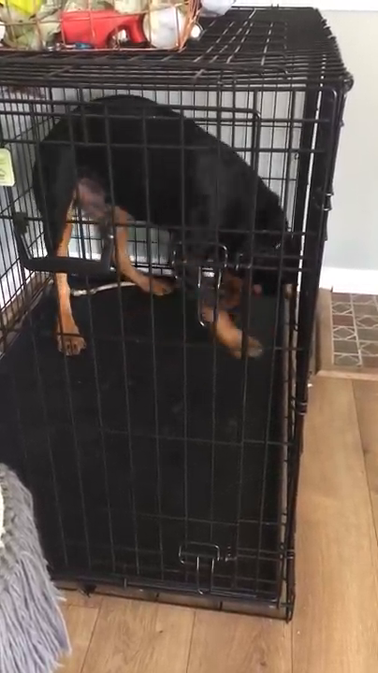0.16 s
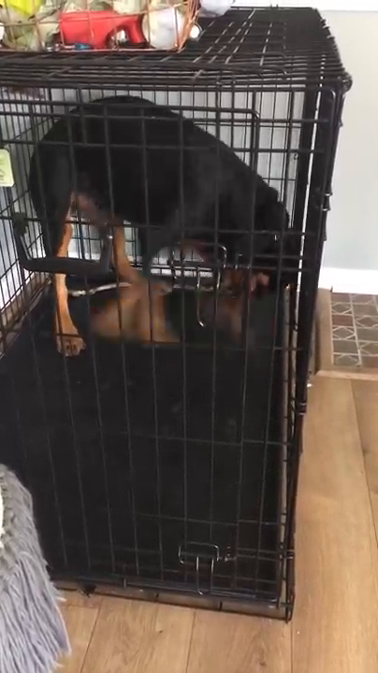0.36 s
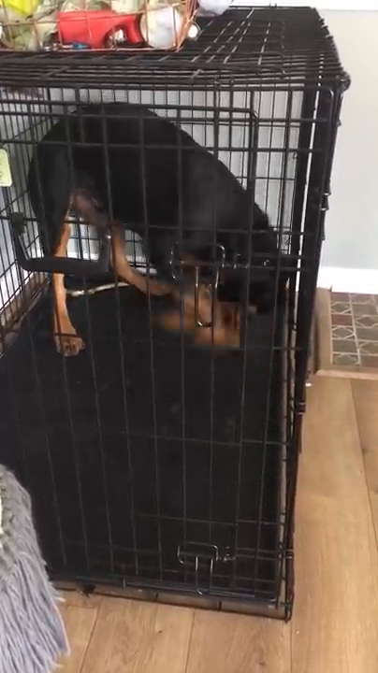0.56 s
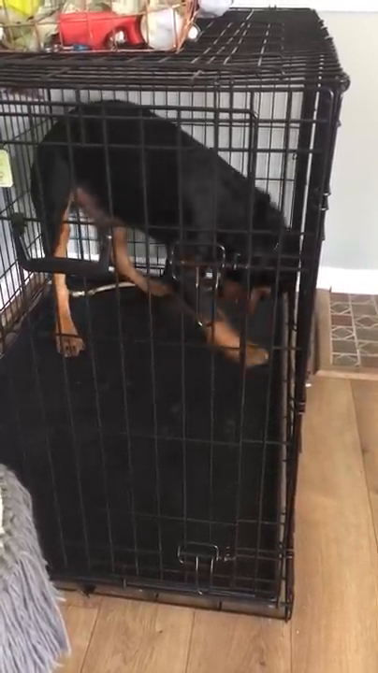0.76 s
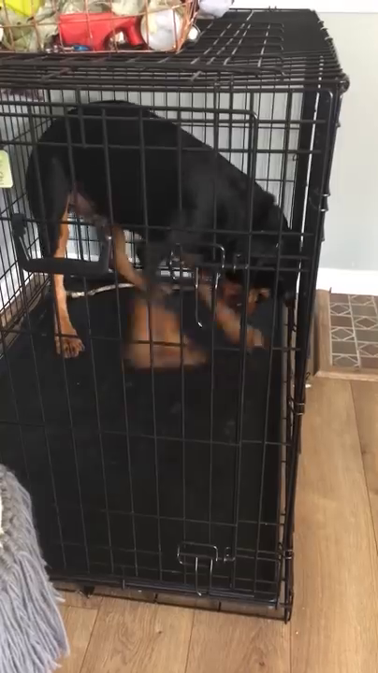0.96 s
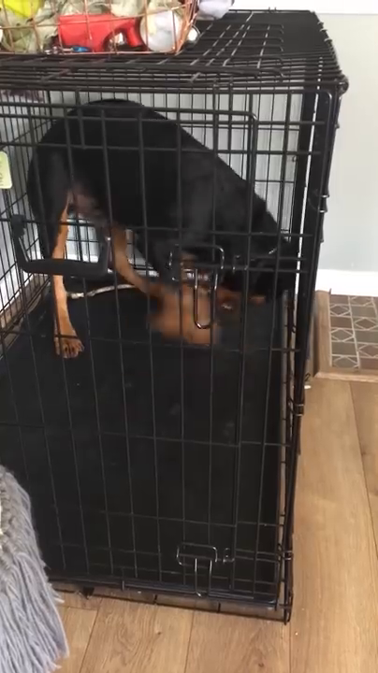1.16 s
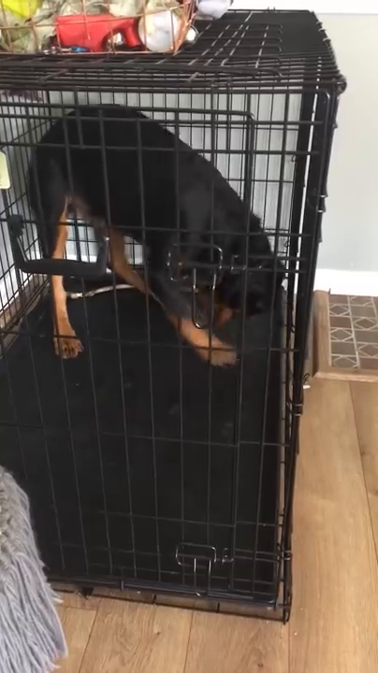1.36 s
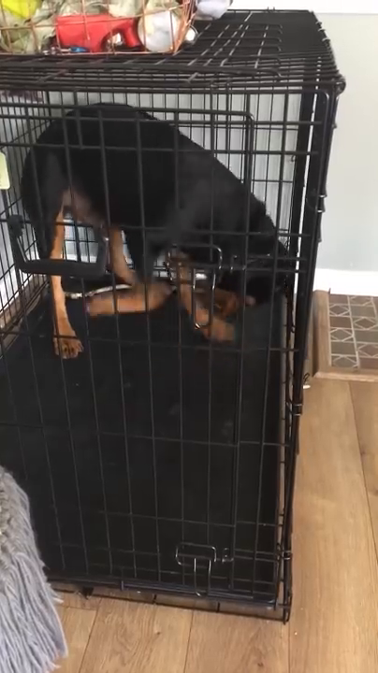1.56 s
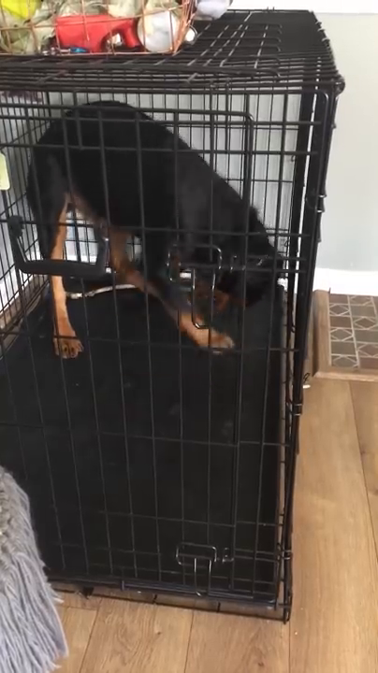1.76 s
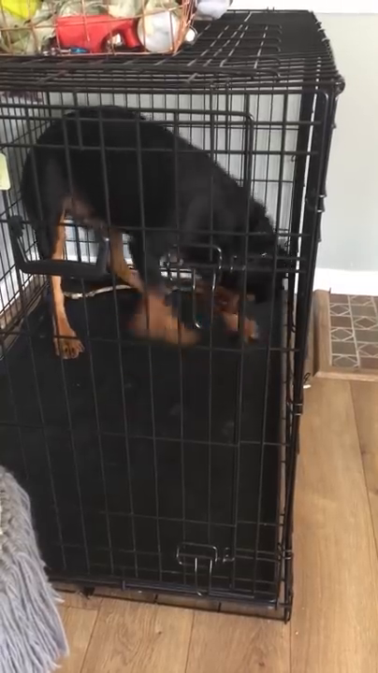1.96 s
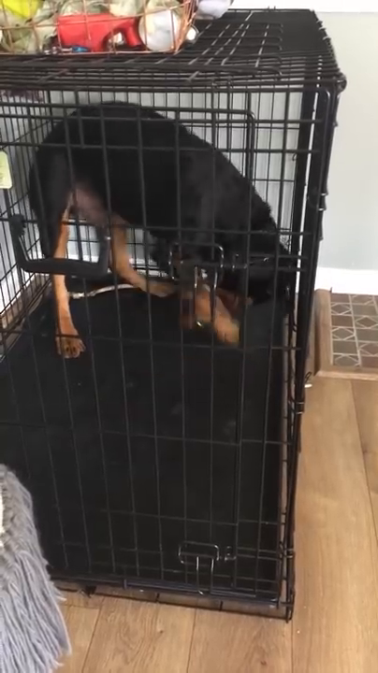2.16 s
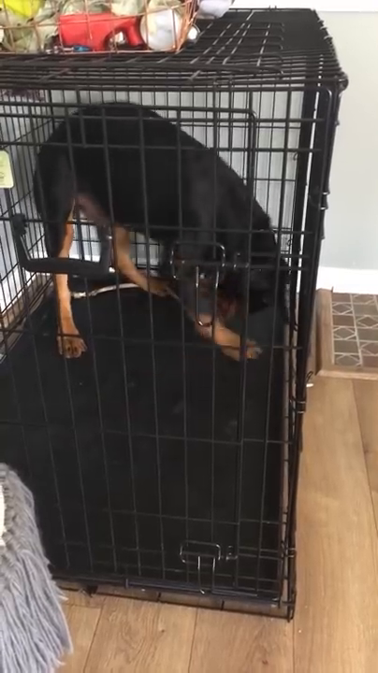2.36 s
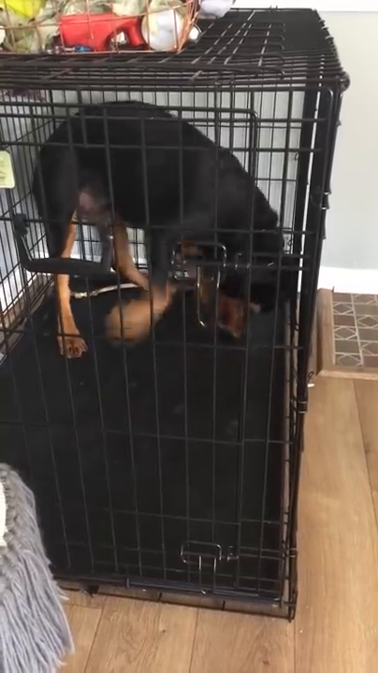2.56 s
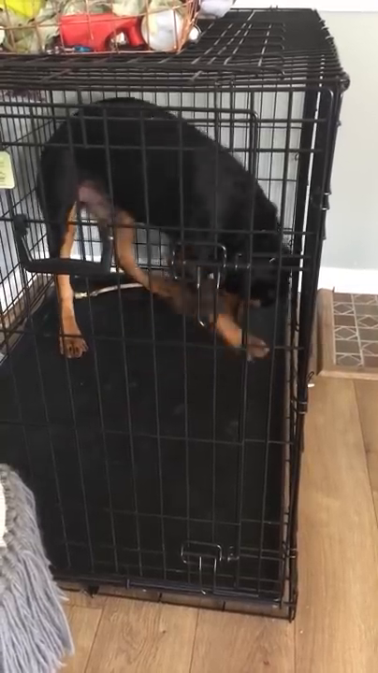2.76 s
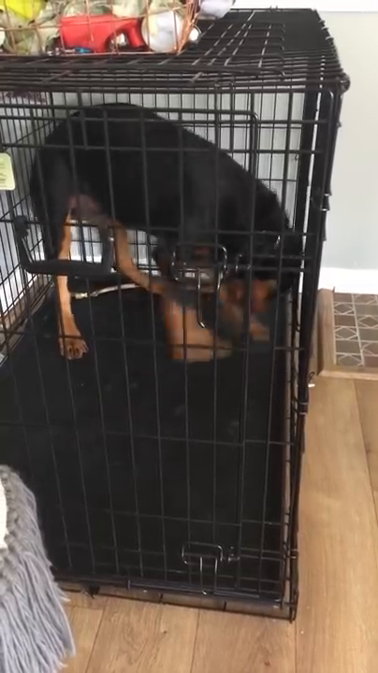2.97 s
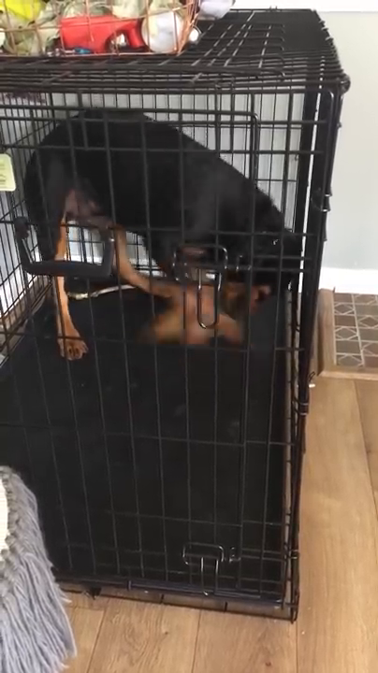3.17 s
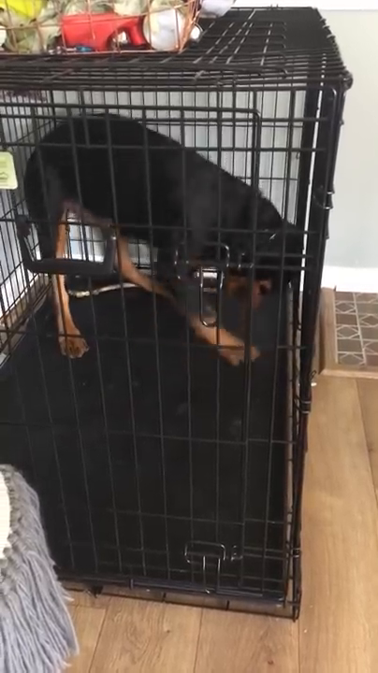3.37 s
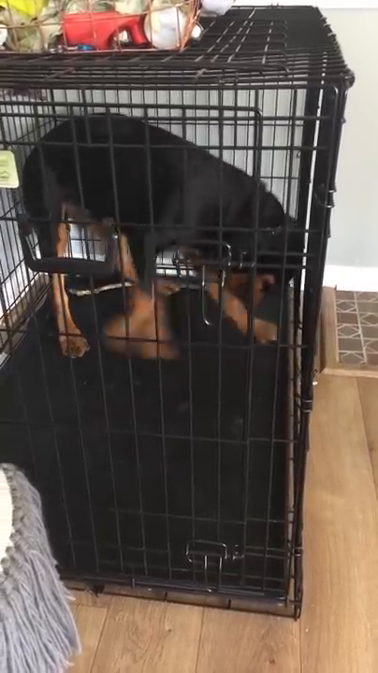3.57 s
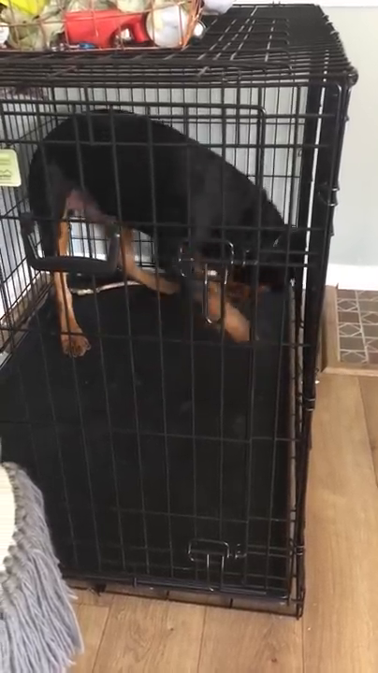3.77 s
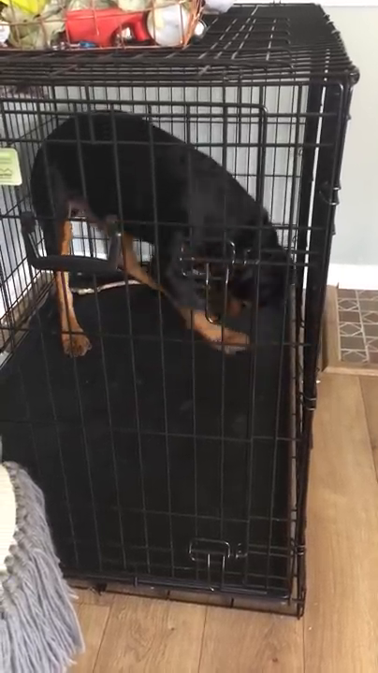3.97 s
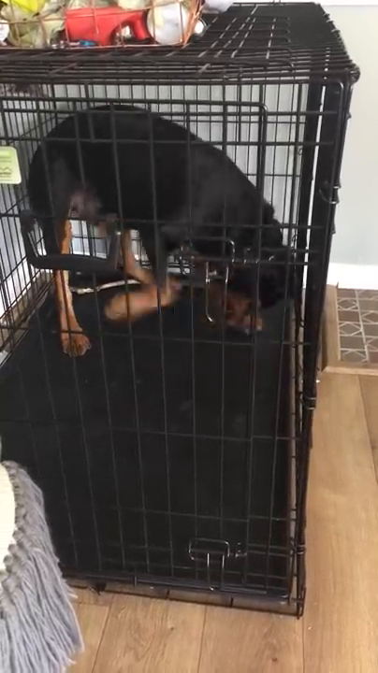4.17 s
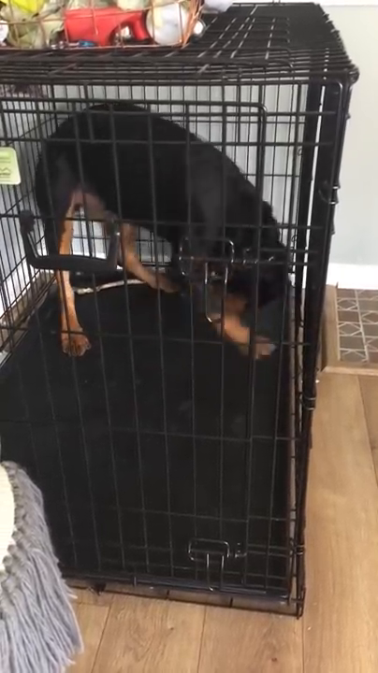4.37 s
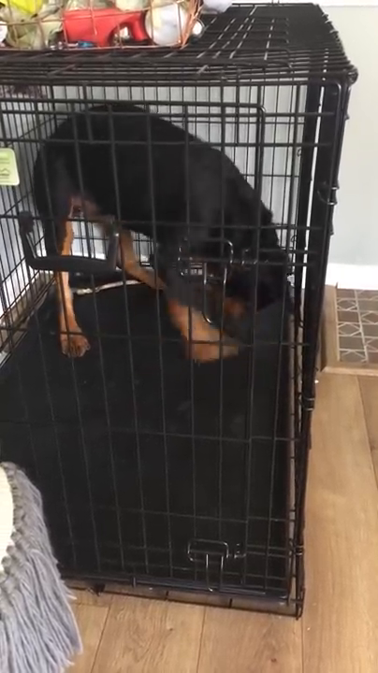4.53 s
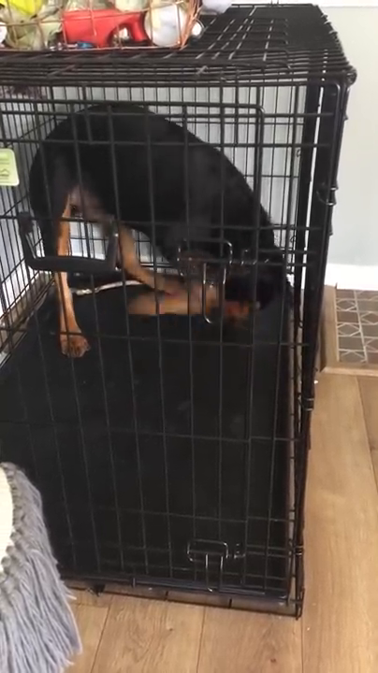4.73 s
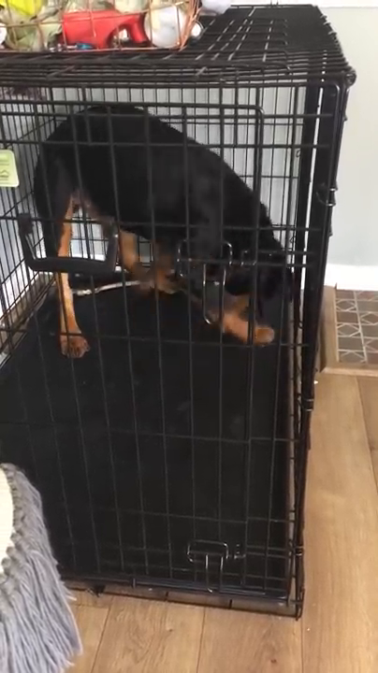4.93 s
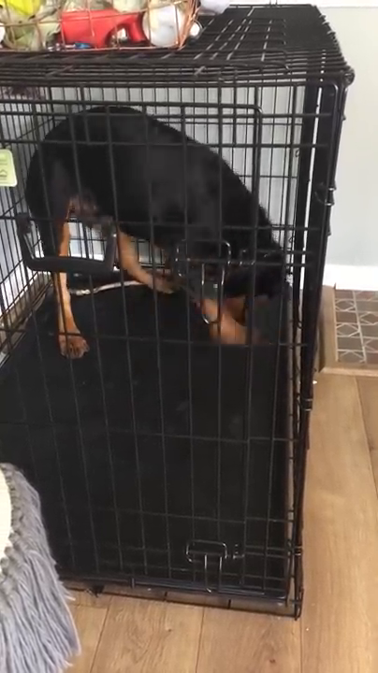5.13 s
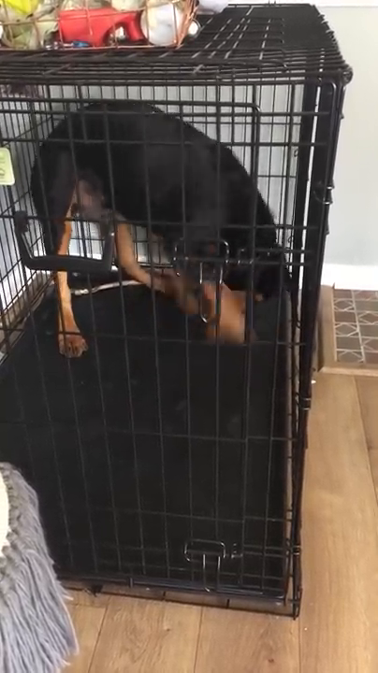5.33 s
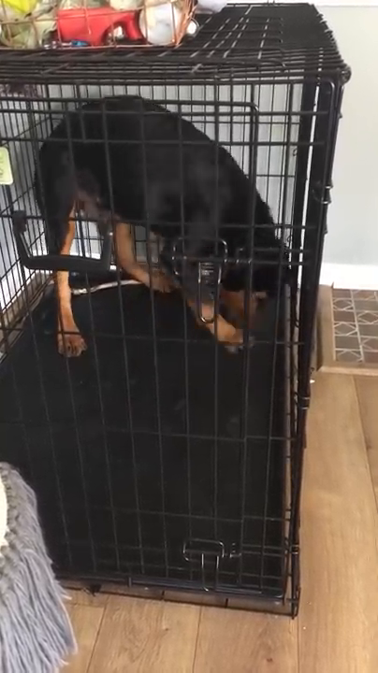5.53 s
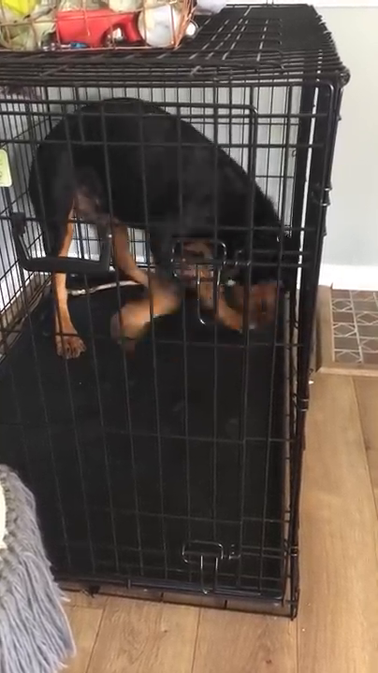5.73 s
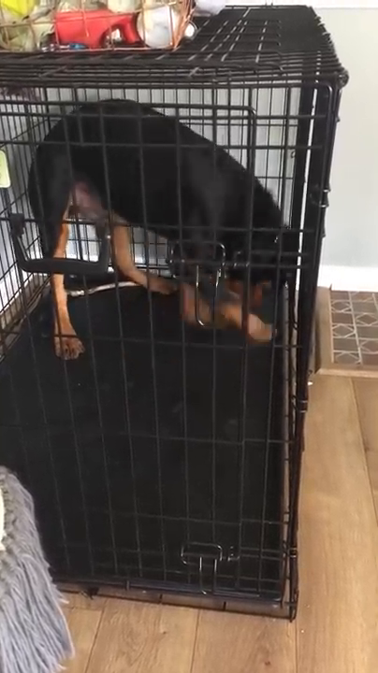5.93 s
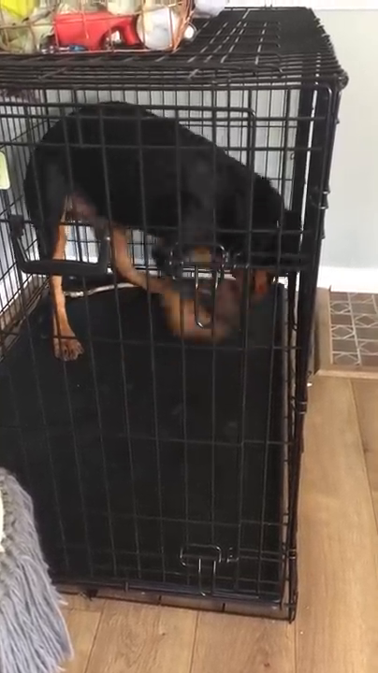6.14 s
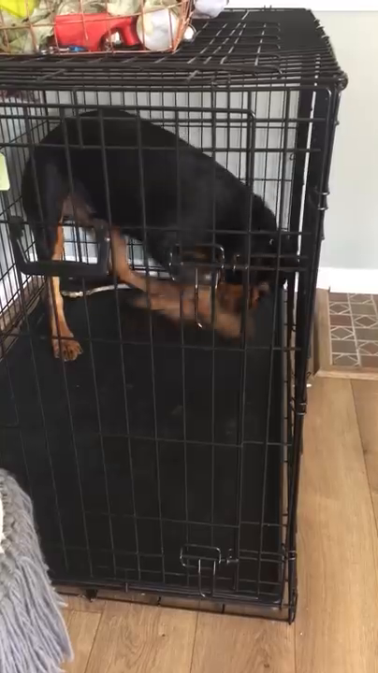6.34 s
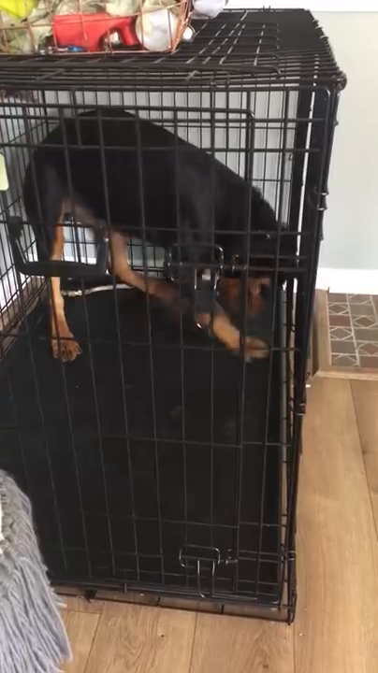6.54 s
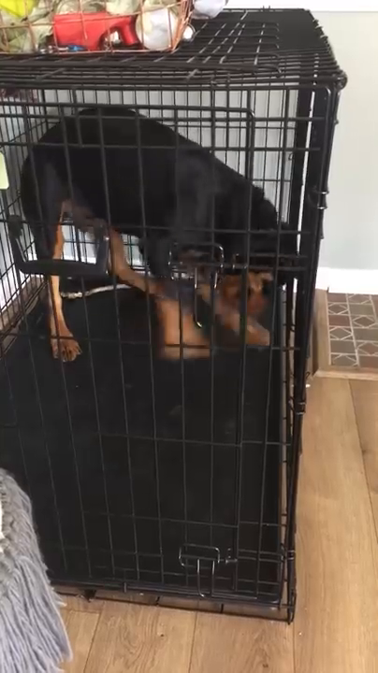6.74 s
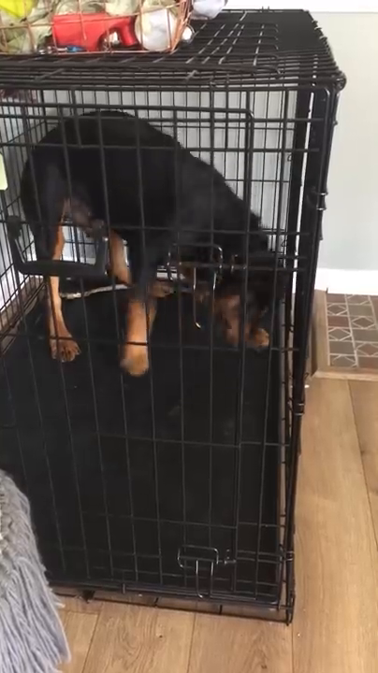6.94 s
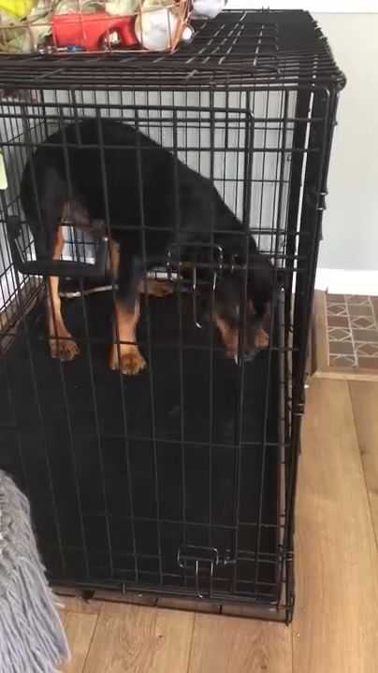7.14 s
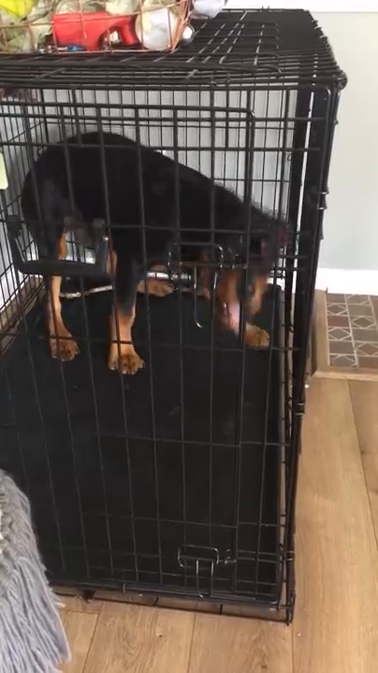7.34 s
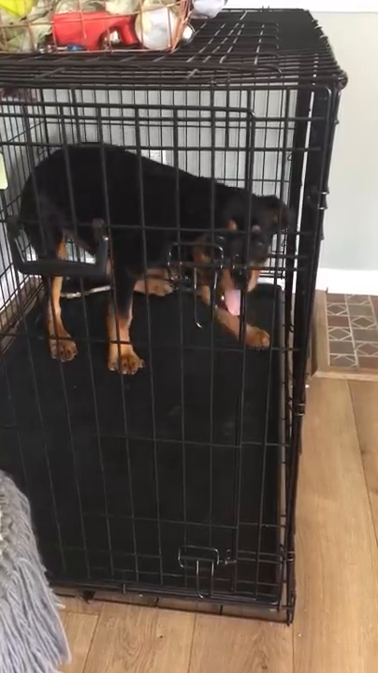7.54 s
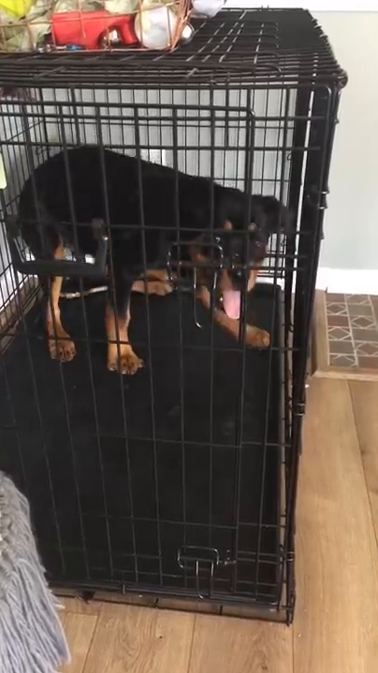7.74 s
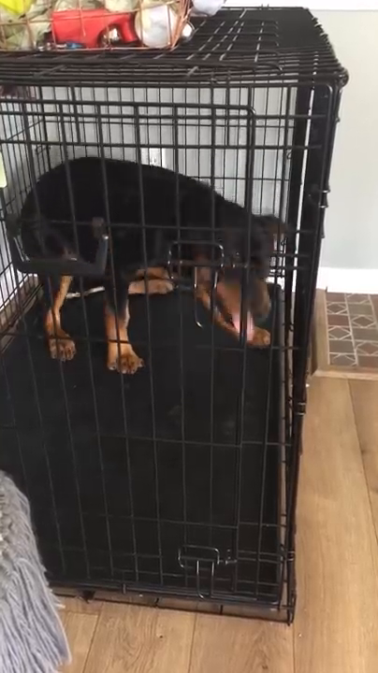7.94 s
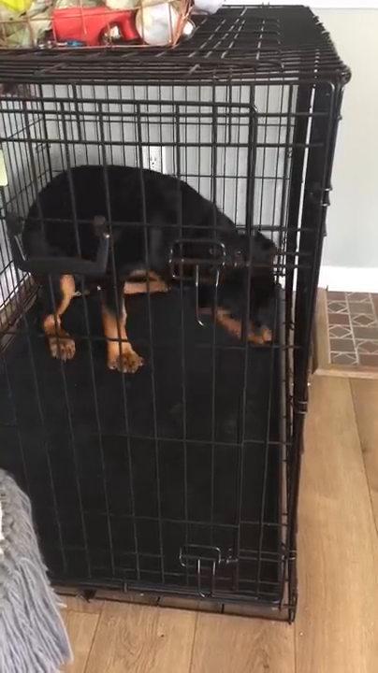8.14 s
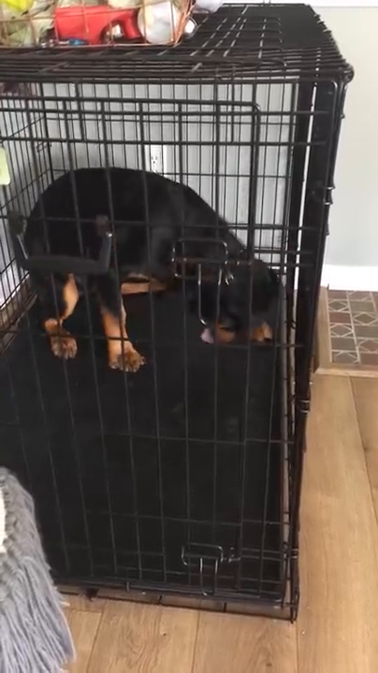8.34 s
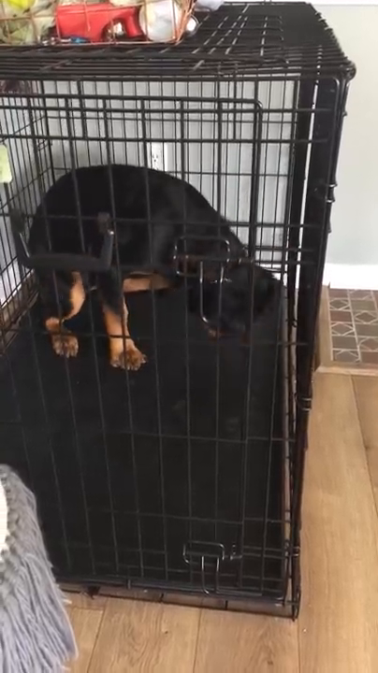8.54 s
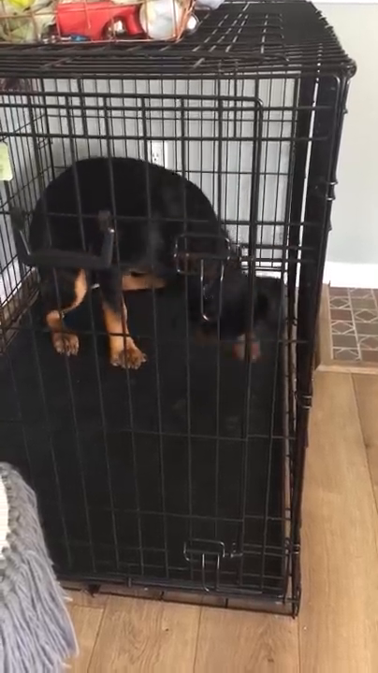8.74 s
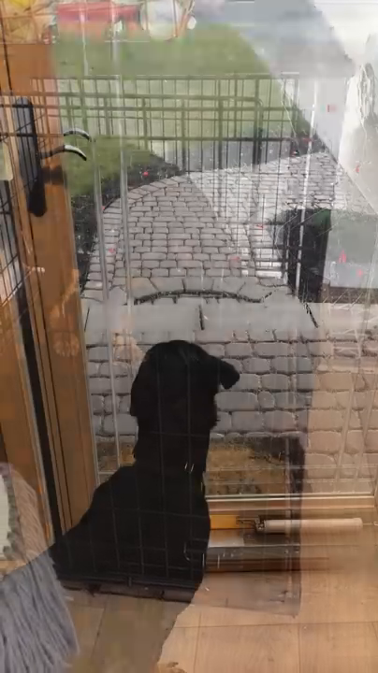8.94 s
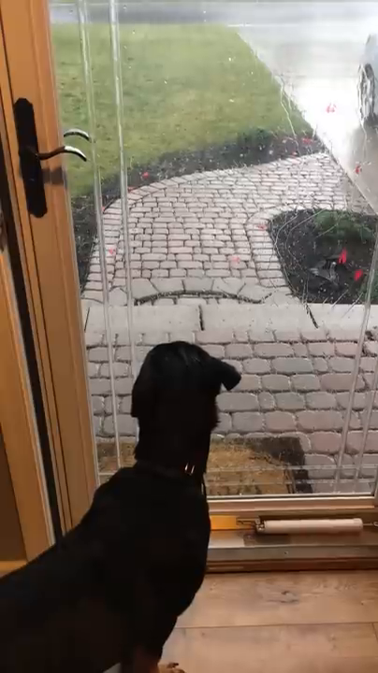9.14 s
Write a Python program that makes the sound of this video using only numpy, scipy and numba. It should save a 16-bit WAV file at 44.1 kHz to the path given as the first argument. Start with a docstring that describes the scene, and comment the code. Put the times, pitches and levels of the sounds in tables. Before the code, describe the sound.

A dog digs fast at a wire crate's hard tray, claws scraping and tags chinking, then pauses to pant faintly.

```python
"""Claws judder over the hard tray of a wire crate: a puppy digging with alternate forepaws, a metre
or two from a phone microphone in a bare room. The claw tips catch and slip, ringing the tray and
shaking the crate; paws thump, collar tags chink. The pup stops to pant, shifts and digs once more.
The sound breaks off during a clatter; after a short silence comes a low rumble in another spot."""
import sys
import numpy as np
from scipy import signal
from scipy.fft import rfft, irfft
from scipy.io import wavfile
from scipy.ndimage import uniform_filter1d
from numba import njit

SR = 44100
rng = np.random.default_rng(int(sys.argv[2]) if len(sys.argv) > 2 else 0)


def pcm_store(signal):
    """Save signal as 16-bit PCM."""
    levels = np.round(np.clip(np.atleast_2d(signal), -1, 1) * 32767)
    wavfile.write(sys.argv[1], SR, levels.astype(np.int16).T)


N = 410130
T = np.arange(N) / SR

# Paw contacts. Levels are relative; tilt is upper over lower tray modes; rasp and pad are re the tray.
# claw strokes: peak_s, level_db, rise_s, fall_s, tilt_db, rasp_db
CLAW_STROKES = [(0.076, -26.5, 0.046, 0.018, 0, -23), (0.369, -29.5, 0.032, 0.039, -1.5, -34),
                (0.565, -25, .007, 0.021, 1, -22), (0.927, -31.5, 0.021, 0.023, 0.5, -26),
                (1.183, -28, 0.093, .039, -1.5, -26.5), (1.427, -30, .057, 0.035, -3.5, -28),
                (1.684, -25.5, 0.02, 0.017, 0.5, -22), (1.917, -28, 0.033, 0.017, 4, -18),
                (2.167, -26, 0.029, 0.036, -0.5, -24), (2.451, -30, .035, 0.033, -0.5, -29),
                (2.719, -28, 0.06, 0.023, -0.5, -25), (2.942, -31.5, 0.022, .045, 0.5, -29),
                (3.211, -28.5, 0.043, .03, 0, -23), (3.478, -29, 0.032, 0.024, -2, -28),
                (3.748, -27.5, 0.07, 0.048, -1.5, -24), (4.027, -28, 0.026, 0.048, -4, -26.5),
                (4.299, -26, 0.024, 0.026, -1, -30.5), (4.596, -29, 0.037, 0.022, -2, -26.5),
                (4.799, -26.5, 0.042, 0.03, -1.5, -28.5), (5.097, -30.5, 0.037, .025, -2.5, -32),
                (5.369, -30, 0.045, .047, -2, -26.5), (5.631, -30, 0.014, .014, 9.5, -13.5),
                (5.871, -29.5, 0.073, 0.057, -3, -24.5), (6.181, -29.5, 0.042, 0.02, 0, -23),
                (6.366, -27.5, 0.013, 0.03, 6, -12.5), (6.655, -31, 0.01, 0.021, -3.5, -25),
                (6.699, -30, 0.023, 0.024, -4, -30), (6.96, -31.5, 0.1, 0.062, -2, -27),
                (8.631, -39.5, 0.054, 0.082, 2, -25), (8.754, -34.5, 0.05, 0.032, -6, -33)]
# duller pad rubs between strokes: peak_s, level_db, rise_s, fall_s, pad_db
PAD_RUBS = [(0.31, -41, 0.3, 0.054, -4.5), (0.48, -35.5, 0.085, 0.14, -6), (0.833, -40, 0.056, 0.15, -9.5),
            (1.1, -39, 0.03, .035, -6), (1.275, -37, 0.017, 0.055, -4.5), (1.64, -37, 0.069, 0.062, -5.5),
            (1.861, -38, 0.082, 0.1, -6.5), (2.09, -42.5, 0.027, 0.12, -1.5),
            (2.334, -41.5, 0.058, 0.16, -3), (2.64, -38, 0.042, 0.051, -6), (2.868, -43.5, 0.04, 0.18, -6),
            (3.14, -36.5, 0.065, 0.048, -5.5), (3.384, -37, 0.052, 0.14, -9.5), (3.64, -39, 0.03, 0.08, -6),
            (3.98, -34, 0.096, 0.085, -10.5), (4.184, -41.5, 0.035, .046, -5), (4.26, -44, 0.051, .04, 3),
            (4.5, -38.5, 0.064, 0.052, -3.5), (4.72, -40, 0.11, 0.038, -4.5),
            (4.973, -44, 0.039, 0.11, -1.5), (5.7, -47.5, 0.069, 0.0097, -5),
            (6.04, -45.5, .015, 0.27, -2.5), (6.317, -30.5, 0.035, 0.11, -13.5),
            (6.584, -39, 0.073, .06, -2.5), (7.12, -49.5, 0.09, 0.018, -10), (8.66, -45, 0.074, 0.12, 0),
            (8.839, -51.5, 0.063, 0.037, -16)]
# claws striking suddenly and skidding on: peak_s, level_db, skid_s, rasp_db
CLAW_SKIDS = [(0.314, -32.5, .035, -23), (0.525, -34.5, 0.1, -17.5), (0.811, -32, 0.049, -24),
              (1.424, -30.5, 0.034, -11), (1.619, -36.5, 0.13, -22.5), (2.406, -32, 0.039, -24),
              (2.925, -36, 0.025, -15), (2.978, -33.5, 0.029, -23), (3.098, -52.5, 0.013, -2),
              (3.44, -32, 0.06, -22), (3.572, -51, 0.011, -11), (4.22, -39.5, 0.099, -11),
              (4.529, -31.5, 0.049, -24), (4.762, -33.5, 0.024, -12), (5.032, -31, 0.082, -25.5),
              (5.132, -43.5, .005, 3.5), (5.244, -36.5, 0.038, -15.5), (5.552, -34, 0.1, -20),
              (5.801, -38, 0.055, -15), (6.104, -36, 0.077, -22), (6.636, -39, 0.038, -18),
              (6.867, -41, 0.063, -19)]
# paws landing on the tray: start_s, level_db, pitch_hz
PAW_THUMPS = [(0.567, -34.5, 177), (0.614, -34, 140), (1.141, -55, 143), (1.446, -38, 134),
              (1.765, -46, 146), (1.912, -36.5, 161), (2.185, -46.5, 141), (2.692, -44, 70),
              (2.942, -42.5, 133), (3.611, -45, 172), (4.346, -38.5, 161), (4.407, -44, 159),
              (4.816, -50, 141), (5.128, -40, 120), (5.246, -43, 96), (5.585, -39.5, 141),
              (5.657, -40.5, 115), (6.201, -48, 161), (6.414, -40.5, 146), (6.578, -38.5, 166),
              (7.944, -59, 100), (8.17, -62, 149), (8.211, -57, 109), (8.577, -45, 165), (8.951, -43, 136)]
# small blows: start_s, level_db
CLAW_TAPS = [(8.27, -37.5), (8.319, -46), (8.3793, -42), (8.4824, -43.5), (8.5475, -45)]
TAG_CHINKS = [(0.0564, -44), (0.2306, -50), (0.3117, -55.5), (2.2967, -54.5), (3.0964, -46), (3.5743, -48),
              (3.6586, -45), (5.1926, -50), (5.424, -42.5), (5.4816, -54), (5.542, -46.5), (5.7349, -48.5),
              (5.8032, -44), (5.826, -38), (7.0324, -59), (7.214, -53.5), (7.2672, -43), (7.3207, -41)]
# panted breaths: peak_s, level_db, half_length_s
BREATHS = [(7.49, -63, 0.05), (7.68, -65, 0.069), (7.88, -77, .06), (8.08, -67.5, 0.047),
           (8.172, -72.5, 0.016), (8.22, -64, 0.015), (8.3, -58, 0.041), (8.524, -63, 0.11)]

# struck modes: pitch_hz, level_db, t60_s
TAP_MODES = [(1125, -9, .05), (1615, -3, .055), (1911, 0, .045), (2150, -3, .045), (2640, -3, .04),
             (3074, -4, .03), (4000, -6, .02)]
TAG_MODES = [(6050, -17, .05), (8760, -19, .09), (8850, 0, .06), (12620, -20, .05), (12830, -22, .06),
             (15650, -18, .05)]
# resonances, which resonate() shifts in pitch: nominal_hz, width_hz, level_db
TRAY_BODY_MODES = [(347, 205, -5), (461.4, 64.4, 2), (684, 157, 2.5), (875, 380, -7.5)]  # under the soft pad
TRAY_LOW_MODES = [(1060, 300, -3), (1230.4, 222, 6.5), (1444, 179, 5)]  # under the claws
TRAY_HIGH_MODES = [(1715, 128, 17.5), (2430, 330, 17), (2887, 580, 10.5), (3665, 610, -6)]
RASP_BANDS = [(4820, 820, 28.5), (5380, 1170, 30.5), (6860, 3800, 16.5), (8100, 1600, -1),
              (11130, 1900, 10), (15000, 2500, 17.5)]
CRATE_MODES = [(69, 30, -10), (118, 61, -5), (160.1, 72.5, 1), (213.3, 66, -7.5), (326, 150, -7.5)]
FUR_BANDS = [(6470, 4400, -3), (12500, 6000, -9)]
MOUTH_FORMANTS = [(707, 140, -2), (1155, 250, 4.5), (1440, 210, -6), (2310, 330, -3.5), (3120, 340, -4.5),
                  (5700, 1300, -20)]
UNEVEN_TICK_BANDS = [(3100, 1300, 0), (5200, 3000, -11), (9000, 3500, -20)]
EVEN_TICK_BANDS = [(3100, 1300, 2.5), (5940, 1400, -2), (9000, 4000, -9), (14000, 4000, -12.5)]

# decay of the bare room: band_hz, t60_s
ROOM_DECAY = [(150, 0.39), (600, 1), (2000, 0.68), (5000, 0.45), (11000, 0.37)]
# steady background hush, with no hiss above about 12 kHz: frequency_hz, density_db
HUSH_SPECTRUM = [(25, -23), (60, 1), (110, -2.5), (350, -15.5), (1000, -22), (3000, -33), (5000, -36.5),
                 (11500, -43), (12500, -60)]
# low rumble after the silence: frequency_hz, density_db
RUMBLE_SPECTRUM = [(15, -30.5), (25, -7), (145, -3.5), (326, -10.5), (463, -16), (863, -19.5),
                   (1100, -19.5), (5880, -40), (16000, -53)]

SLIPS_PER_S, SLIP_SCATTER_DB, JUDDER_DB = 5000, 1.8, 1.6
DRAG_SWEEP, SHIFT_PER_TILT_DB = 0.11, 0.018  # the tray modes rise along a drag and with its brightness
CLATTER_S, CLATTER_T60_S, CLATTER_DB, RATTLE_DB = 8.938, .13, -35, -43.5
ECHO_DB, ECHO_TAILS, CROSSFADE_S = -11, 3, .27
BREAK_S, RESUME_S = 9.024, 9.1345


def digging():
    """Slipping claws ring the tray and rasp; their shaking makes the whole crate boom."""
    body, low, high, rasp, shift = drag_envelopes()
    crash = clatter()
    body, low, high = body + crash / 20, low + crash / 2, high + crash / 2
    rasp = rasp + crash * undb(2 * -14)
    force = slips()
    tray = np.sqrt(low) * resonate(force, TRAY_LOW_MODES, shift)
    tray += np.sqrt(high) * resonate(force, TRAY_HIGH_MODES, shift)
    scratch = np.sqrt(rasp) * resonate(force, RASP_BANDS)
    pad = np.sqrt(body) * resonate(slips(), TRAY_BODY_MODES, 0.92 * shift ** 1.23)
    shaking = np.abs(uniform_filter1d(low + high, int(.18 * SR))) ** 0.42
    shaking *= undb(1.5 * wander(6))
    boom = undb(-24) * shaking * resonate(rng.standard_normal(N), CRATE_MODES)
    fur = undb(-43.5) * shaking * resonate(rng.standard_normal(N), FUR_BANDS)
    return undb(2.5) * tray + undb(-0.5) * pad + undb(1.5) * scratch + boom + fur


def paw_contacts():
    """Every stroke, rub and skid as peak_s, level_db, rise_s, fall_s, rasp_db, tilt_db, pad_db."""
    for peak_s, db, rise_s, fall_s, tilt_db, rasp_db in CLAW_STROKES:
        yield peak_s, db, rise_s, fall_s, rasp_db, tilt_db, -17
    for peak_s, db, rise_s, fall_s, pad_db in PAD_RUBS:
        yield peak_s, db, rise_s, fall_s, -28, -5.5, pad_db
    for peak_s, db, skid_s, rasp_db in CLAW_SKIDS:
        yield peak_s, db, .005, skid_s, rasp_db, 1, -10


def drag_envelopes():
    """Power the paws feed to the tray's body, low and high modes and rasp, and the modes' pitch shift."""
    body, low, high, rasp, climb = np.zeros((5, N))
    for peak_s, db, rise_s, fall_s, rasp_db, tilt_db, pad_db in paw_contacts():
        span = slice(max(int((peak_s - 3 * rise_s) * SR), 0), int((peak_s + 3 * fall_s) * SR))
        along = (T[span] - peak_s) / np.where(T[span] < peak_s, rise_s, fall_s)
        power = undb(2 * db) * np.exp(-2 * np.abs(along) ** 1.95)
        high_share = 1 / (1 + undb(-2 * (tilt_db + 0.26 * along)))  # brighter as the paw speeds up
        body[span] += power * undb(2 * pad_db - 0.73 * along)  # the soft pad lands and rubs first
        low[span] += power * (1 - high_share)
        high[span] += power * high_share
        rasp[span] += power * undb(2 * rasp_db)
        climb[span] += power * (DRAG_SWEEP * along + SHIFT_PER_TILT_DB * tilt_db)
    mean_climb = np.clip(climb / (low + high + 1e-7), -.4, .4)
    shift = np.exp(uniform_filter1d(mean_climb, size=200) + 0.037 * wander(12))
    return body, low, high, rasp, shift


def slips():
    """Claw tips catch and let go thousands of times a second, in uneven bursts."""
    caught = rng.random(N) < SLIPS_PER_S / SR
    size = undb(SLIP_SCATTER_DB * rng.exponential(1, N)) * rng.choice([-1, 1], N)
    return caught * size * undb(JUDDER_DB * wander(120))


def clatter():
    """Power of a crash on the tray that dies quickly and rattles on."""
    since_s = np.maximum(T - CLATTER_S, 0)
    crash_db = CLATTER_DB - 60 * since_s / CLATTER_T60_S
    return (since_s > 0) * (undb(2 * crash_db) + undb(2 * RATTLE_DB))


def paw_thumps():
    """A soft paw lands and sets three low tray modes ringing."""
    out = np.zeros(N)
    for start_s, db, hz in PAW_THUMPS:
        modes = [(hz, 0, .22), (.47 * hz, -7, .35), (2.0 * hz, -9, .12)]
        add(out, start_s, undb(db) * ring(modes, spread_db=1.4, push_s=0.0053, buzz=0))
    return out


def chinks_and_taps():
    """Collar tags chink, and claws tap as the pup shifts: each a hard snap and a buzzing ring."""
    out = np.zeros(N)
    snap = np.exp(-T[:SR // 4] / .001) * resonate(rng.standard_normal(SR // 4), RASP_BANDS)
    for start_s, db in TAG_CHINKS:
        tag = ring(TAG_MODES, spread_db=2.5, push_s=.0015, buzz=.5)
        add(out, start_s, undb(db) * (tag + .13 * snap))
    for start_s, db in CLAW_TAPS:
        tap = ring(TAP_MODES, spread_db=2.5, push_s=.0012, buzz=.6)
        add(out, start_s, undb(db) * (tap + .1 * snap))
    return out


def panting():
    """Air rushes through the open mouth, swelling and fading with each breath."""
    air = rng.standard_normal(N) * undb(2.5 * wander(67))
    flow = sum(undb(db) * np.exp(-((T - peak_s) / half_s) ** 2) for peak_s, db, half_s in BREATHS)
    return flow * resonate(air, MOUTH_FORMANTS)


def room_echoes(direct):
    """Dense echoes that die sooner in the treble; three tails crossfade to keep the decay smooth."""
    t, out = T[:SR], 0
    for turn in range(ECHO_TAILS):
        tail = 0
        for hz, t60 in ROOM_DECAY:
            band = resonate(rng.standard_normal(SR), [(hz, 0.77 * hz, 0)])
            tail += undb(-60 * t / t60) * band * np.sqrt(hz)
        tail *= np.clip((t - .003) / 0.004, 0, 1)  # echoes reach the microphone after the direct sound
        tail /= np.sqrt(np.sum(tail ** 2))
        fade = np.sqrt(2 / ECHO_TAILS) * np.abs(np.cos(np.pi * (T / CROSSFADE_S + turn) / ECHO_TAILS))
        out += signal.fftconvolve(direct * fade, tail)[:N]
    return undb(ECHO_DB) * out


def background(spectrum, rms_db):
    """A steady hush or rumble: noise with the given spectrum."""
    hz, density_db = np.transpose(spectrum)
    bins_hz = np.arange(1, N // 2 + 2) * SR / N
    gain = undb(np.interp(np.log(bins_hz), np.log(hz), density_db))
    return at_rms(irfft(rfft(rng.standard_normal(N)) * gain, N), rms_db)


def faint_ticks(times_s, bands, rms_db):
    """Tiny, alike clicks close to the microphone."""
    force = np.zeros(N)
    force[(times_s * SR).astype(int)] = undb(1.5 * rng.standard_normal(len(times_s)))
    return undb(rms_db) * resonate(force, bands)


def ring(modes, spread_db, push_s, buzz):
    """One blow on a set of modes, each excited a little differently and fluttering by buzz; peak 1."""
    hz, db, t60 = np.transpose(modes)[:, :, None]
    t = T[:SR // 4]
    strength, detune, phase = rng.standard_normal((3, len(modes), 1))
    flutter = 1 + buzz * 10 * uniform_filter1d(rng.standard_normal((len(modes), len(t))), size=100)
    decay = undb(db + spread_db * strength - 60 * t / t60)
    partials = decay * np.sin(2 * np.pi * hz * (1 + 0.0018 * detune) * t + phase)
    blow = (partials * flutter).sum(0) * np.minimum(t / push_s, 1)
    return blow / np.abs(blow).max()


def resonate(x, modes, shift=0.956):
    """Sum of resonances, each applied twice for dark valleys; shift moves all centres; rms 1."""
    out, shift = 0, shift * np.ones(len(x))
    for hz, width, db in modes:
        shape = np.tan(np.pi * min(hz / SR, .45)), shift, 1.614 * width / hz
        out += undb(db) * bandpass(bandpass(x + 1e-18, *shape), *shape)
    return at_rms(out, 0)


@njit
def bandpass(x, tuning, shift, damping):
    """State-variable filter, gain 1 at the centre; tuning = tan(pi f / SR), scaled by shift."""
    out, band_state, low_state = np.empty(len(x)), 0., 0.
    for i in range(len(x)):
        g = tuning * shift[i]
        band = (band_state + g * (x[i] - low_state)) / (1 + g * (g + damping))
        band_state, low_state = 2 * band - band_state, low_state + 2 * g * band
        out[i] = damping * band
    return out


def wander(rate_hz):
    """Glides between random values, rate_hz of them a second; spread near 1."""
    hold = int(SR / rate_hz)
    steps = np.repeat(rng.standard_normal(N // hold + 1), hold)
    return 1.2 * uniform_filter1d(steps, hold)[:N]


def undb(db):
    """Gain of a dB value."""
    return 10 ** (np.asarray(db) / 20)


def at_rms(x, db):
    """Scale to an rms level."""
    return x * undb(db) / np.sqrt(np.mean(x ** 2))


def add(out, start_s, sound):
    """Mix a short sound in at a time."""
    i = int(start_s * SR)
    out[i:i + len(sound)] += sound[:N - i]


def scene():
    """The puppy in the bare room, a short silence, then the rumble in the other spot; mono."""
    puppy = digging() + paw_thumps() + chinks_and_taps() + panting()
    uneven_s = np.cumsum(rng.uniform(.35, 1.65, 600) / 45)  # about 45 ticks a second
    at_crate = puppy + room_echoes(puppy)
    at_crate += background(HUSH_SPECTRUM, rms_db=-67.5) * undb(1.5 * wander(8))
    at_crate += faint_ticks(uneven_s[uneven_s < 9], UNEVEN_TICK_BANDS, rms_db=-82.5)
    other_spot = background(RUMBLE_SPECTRUM, rms_db=-51.5)
    other_spot += faint_ticks(np.arange(9.1415, 9.298, 1 / 60), EVEN_TICK_BANDS, rms_db=-88)
    cut_out = np.clip((BREAK_S - T) / 0.00071, 0, 1)
    cut_in = np.clip((T - RESUME_S) / 0.0021, 0, 1)
    return (at_crate * cut_out + other_spot * cut_in)[None]


def record(dry):
    """The phone drops the deepest bass and cuts the top."""
    low_cut = signal.butter(2, 44.7, "high", fs=SR, output="sos")
    top_cut = signal.ellip(10, .2, 70, 15850, fs=SR, output="sos")
    return signal.sosfilt(top_cut, signal.sosfilt(low_cut, dry))


dry = scene()
out = record(dry)
pcm_store(out)
```